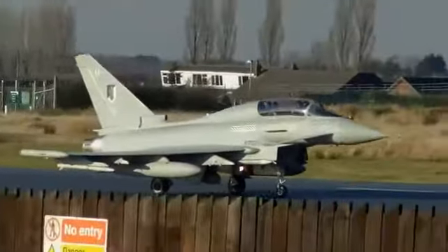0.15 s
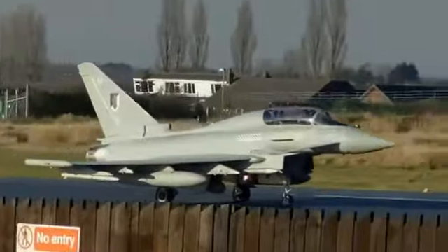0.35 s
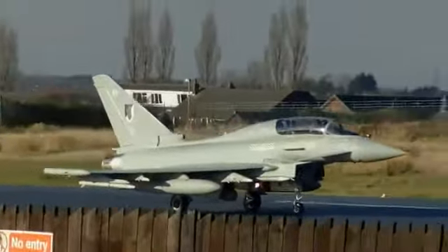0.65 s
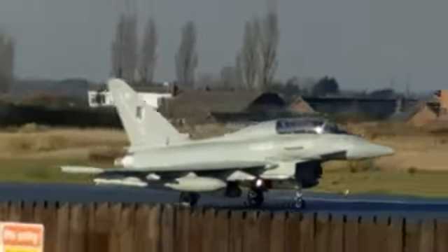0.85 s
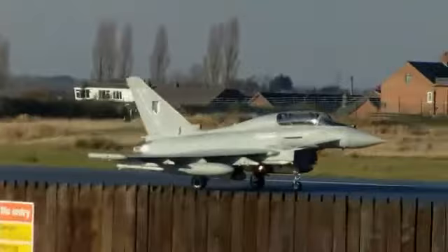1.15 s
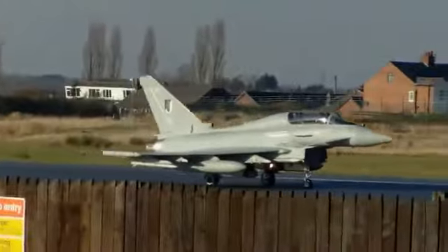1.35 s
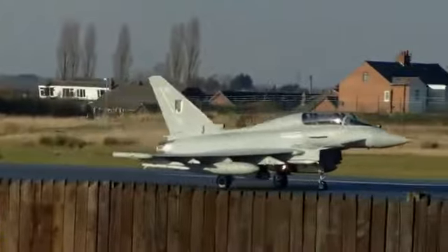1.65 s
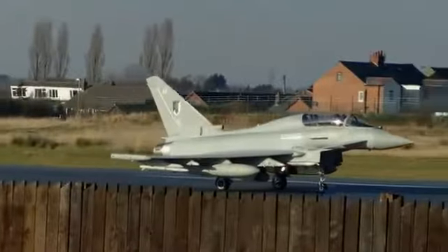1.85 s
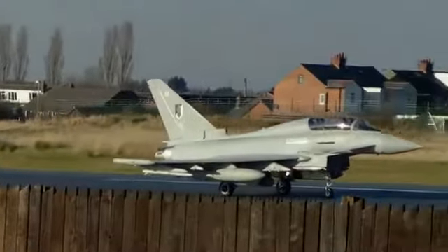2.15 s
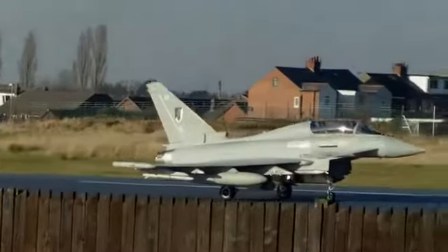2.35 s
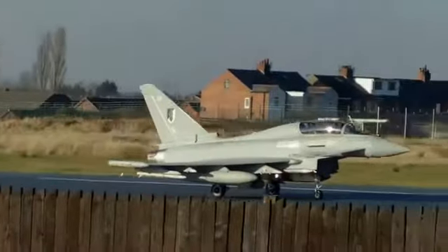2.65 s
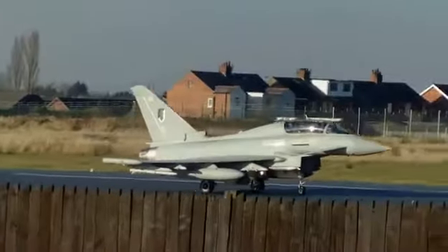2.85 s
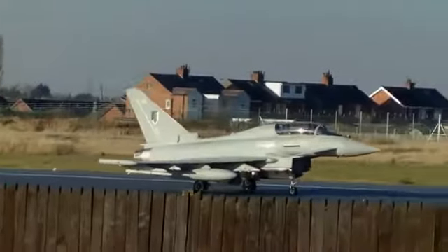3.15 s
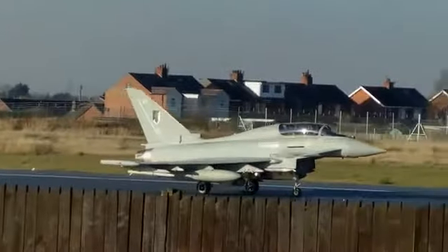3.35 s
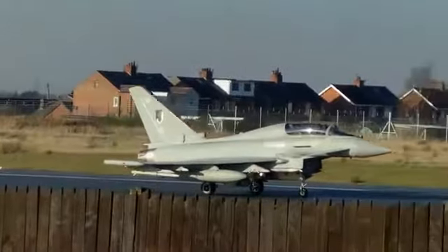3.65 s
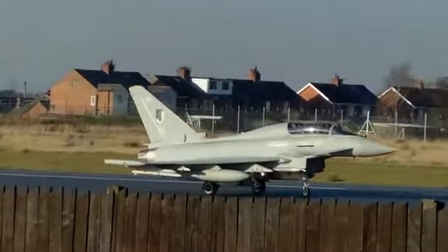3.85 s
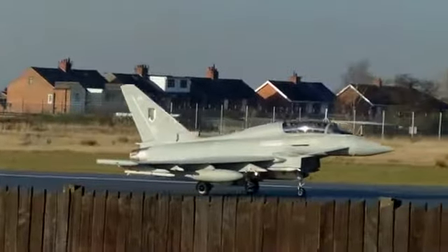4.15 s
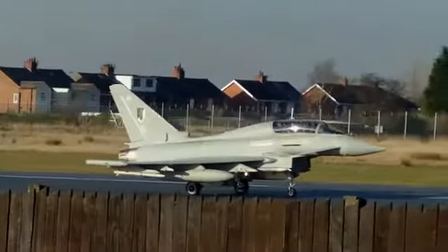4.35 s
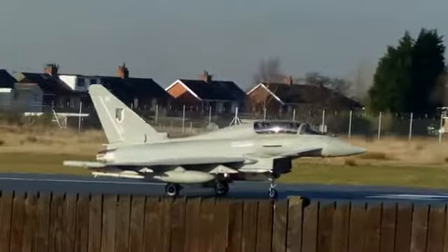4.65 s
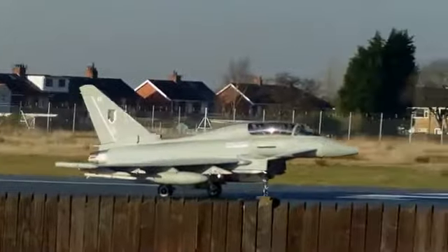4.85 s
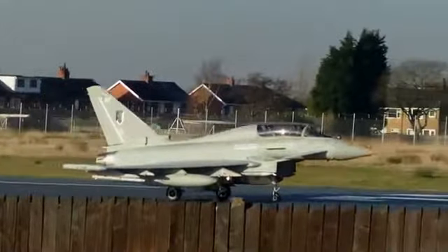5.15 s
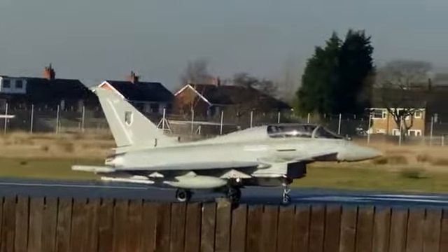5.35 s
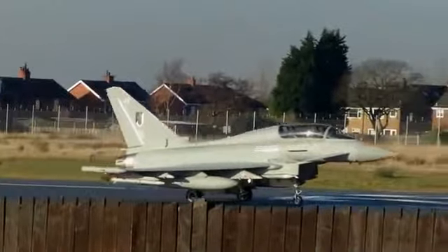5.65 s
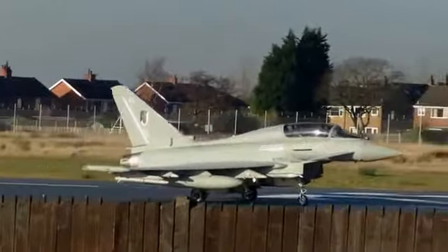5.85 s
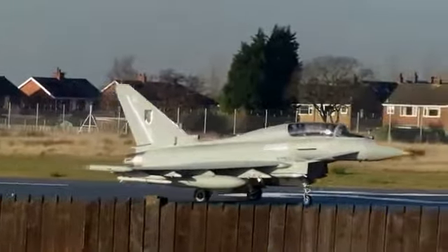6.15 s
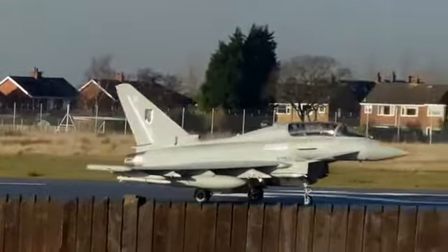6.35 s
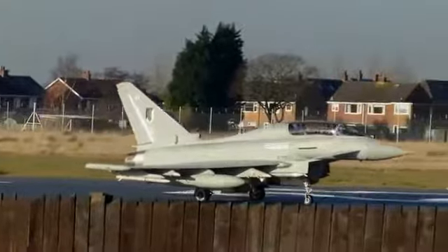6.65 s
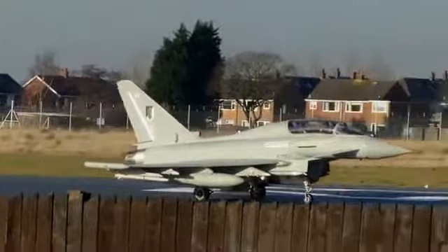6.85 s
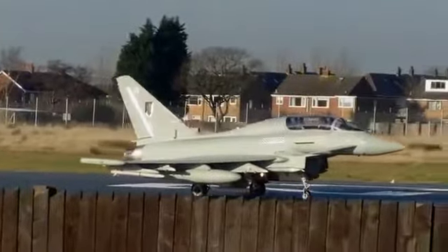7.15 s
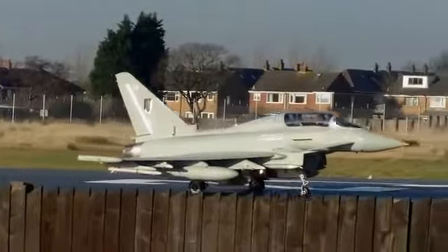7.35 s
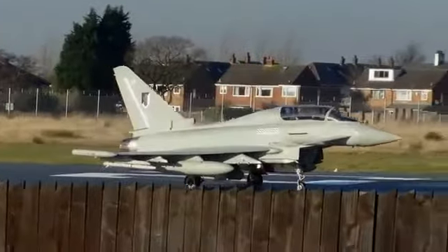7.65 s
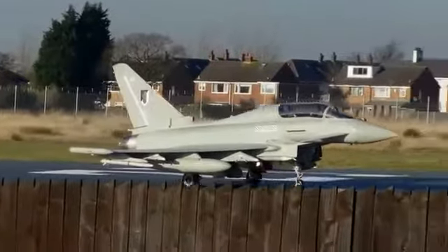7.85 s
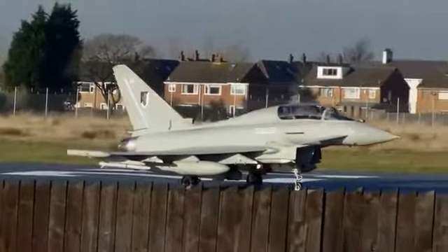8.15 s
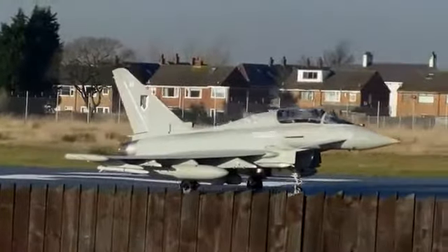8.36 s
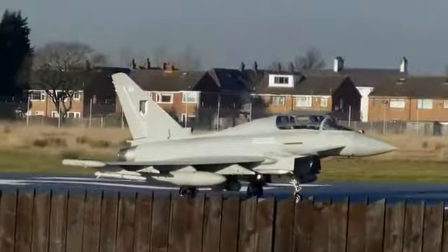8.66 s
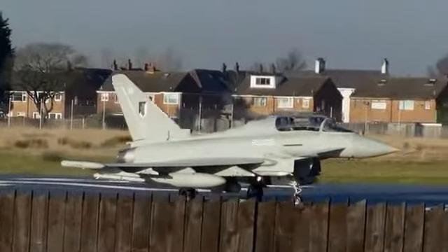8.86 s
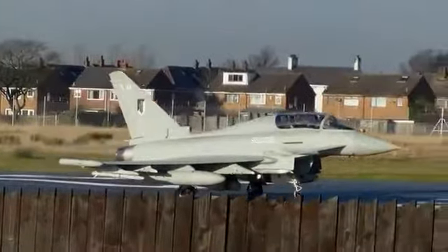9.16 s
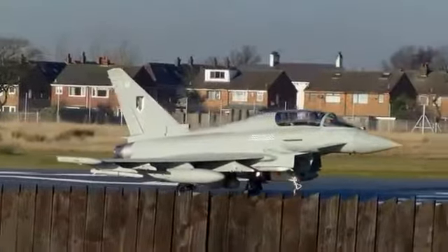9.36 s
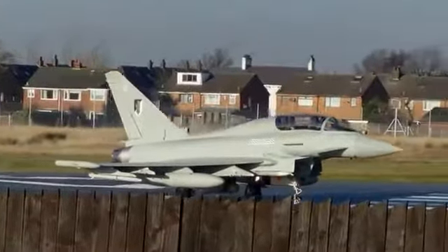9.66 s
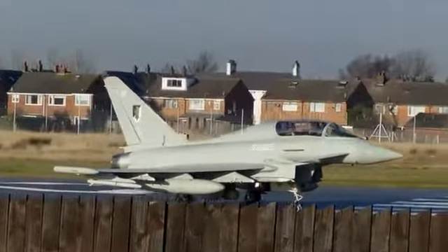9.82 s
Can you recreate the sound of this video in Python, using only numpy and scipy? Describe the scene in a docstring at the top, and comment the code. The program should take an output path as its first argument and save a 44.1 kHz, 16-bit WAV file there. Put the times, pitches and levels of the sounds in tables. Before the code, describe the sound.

Unbroken jet engine noise from a taxiing twin-engined fighter, mono and at some distance outdoors. Mid-high intake rush and sizzling hiss dominate over a weak low rumble and hollow drone. Moving air makes the treble swell and flare irregularly, several times in ten seconds. Faint blade whines waver inside the hiss. A ground reflection gives a subtle hollow colour sliding slowly downward. The roar becomes fuller in the second half; the sound never stops.

```python
"""A twin-engined jet fighter taxis past at idle, heard across an airfield fence.
Its exhausts roar and drone and its intakes rush, as noise shaped by spectra and level curves that move.
A fan howl is a band of noise around a wavering pitch; thin blade whines are wavering sine tones.
Moving air makes the treble swell, flare and fade.
A ground reflection combs the noise, and the comb slides down as the echo's lag grows."""
import sys
import numpy as np
from scipy import signal
from scipy.fft import rfft, irfft
from scipy.io import wavfile
from scipy.ndimage import uniform_filter1d

SR = 44100
rng = np.random.default_rng(int(sys.argv[2]) if len(sys.argv) > 2 else 0)


def bounce(signal):
    """Save signal as a 16-bit WAV file at the path given by the first command-line argument."""
    frames = np.transpose(np.atleast_2d(signal))
    limited = np.clip(frames, -1, 1)
    pcm = np.round(limited * 32767).astype(np.int16)
    wavfile.write(sys.argv[1], SR, pcm)


N = 440559
TIME = np.arange(N) / SR
FRAME, HOP = 2048, 512  # samples
FRAME_S = np.arange(N // HOP + 5) * HOP / SR
BIN_HZ = np.fft.rfftfreq(FRAME, 1 / SR)

# Relative noise spectra of the layers. Each row: frequency in Hz, density in dB.
RUMBLE_SPECTRUM = [(20, -24), (60, -23), (85, -13.5), (105, -18), (130, -3), (155, 0), (230, 1.5),
                   (285, -7.5), (400, -13), (800, -36)]
DRONE_SPECTRUM = [(250, -41), (345, -21), (390, -12), (440, 1), (490, 3), (570, 0), (660, 1.5), (790, 2.5),
                  (900, -13.5), (1400, -52)]
EXHAUST_SPECTRUM = [(350, -33), (600, -26), (765, -19), (835, 1), (1100, 3), (1270, 3), (1390, -5),
                    (1530, 0.5), (1750, 1.5), (2100, -12.5), (3000, -44)]
INTAKE_SPECTRUM = [(1100, -42), (1600, -4), (1850, -4), (2050, 1), (2300, 3.5), (2430, -0.5), (2580, 1),
                   (2800, 0), (3300, -2.5), (3750, -4.5), (4100, -15), (5000, -42), (7000, -44.5)]
HISS_SPECTRUM = [(2800, -40), (3700, 0.5), (4150, 2), (4600, -1.5), (5300, -2), (6100, -6), (6900, -10.5),
                 (7600, -15.5), (8200, -17.5), (9000, -22.5), (10500, -32), (15000, -50)]
FIZZ_SPECTRUM = [(3000, -15), (7000, -3), (10000, 0.5), (12500, 2), (15000, -1)]
# Humps of turbulence chopped by the blades. Each row: centre in Hz, width at half lift in Hz, lift in dB.
INTAKE_HUMPS = [(2036, 230, 3), (2620, 270, 2.5), (3200, 250, 4)]
HISS_HUMPS = [(4710, 130, 4.1), (4910, 250, 7.8), (5740, 190, 4), (6470, 370, 5.9), (7220, 540, 5.3)]

# Low moan of the engines. Each row: time in seconds, level in dB.
MOAN_LEVEL = [(1.5, -75), (3.5, -68.5), (10, -67)]
# Jet pipes, whose roar grows as they turn into view.
# Each row: time in seconds, roar in dB, drone in dB, both before their trims.
EXHAUST_LEVEL = [(0, -42, -45.5), (1, -44.5, -45.5), (2.3, -41.5, -46.2), (3, -44.5, -47.5),
                 (3.4, -40.5, -46.5), (4.9, -41.5, -45), (6.1, -38, -46), (7.5, -36.5, -47.5),
                 (10, -35.5, -47.5)]
# Engine fronts as the aircraft nears and turns side-on.
# Each row: time in seconds, fan rush in dB, blade hiss in dB, both before swell and trim.
INTAKE_LEVEL = [(0, -32, -43.4), (1.8, -35.5, -47), (2.8, -39, -47), (3.5, -34.5, -48), (4.2, -35.5, -46),
                (6.5, -26.5, -37), (10, -27.7, -40.5)]
# Fan howl, a fuzzy whistle that beams out at both ends of the pass.
# Each row: time in seconds, mean pitch in Hz, level in dB against the rush before swell and trim.
HOWL = [(0, 2065, -8), (1.15, 2085, -8), (1.7, 2050, -22), (3.7, 2195, -13), (5, 2181, -15), (7, 2130, -16),
        (8, 2111, -8.5), (10, 2065, -7.5)]
# Compressor blade tones. Each row: frequency in Hz before the Doppler shift, then the level in dB
# against the untrimmed hiss at the start, a third of the way, two thirds and the end.
BLADE_TONES = [(4708, -13, -30, -20, -17), (4986, -22, -13.5, -15, -21), (5736, -12, -26, -24, -19),
               (6482, -20, -23, -19.5, -24)]
# Falling pitch of the pass. Each row: time in seconds, frequency factor of the blade tones.
DOPPLER = [(0, 1.006), (2, 1.003), (5, 1.0), (10, .9975)]

# Swelling and fading of the treble on its way through the moving air.
# Each row: time in seconds, swell in dB before each layer takes its share.
SWELL = [(0.0, 2), (0.43, 5.5), (0.62, -1.5), (0.82, -1.5), (1.3, -7), (1.82, 5), (3.28, -3.5), (3.65, 0.5),
         (3.96, -0.7), (4.22, 4), (4.52, 2), (4.96, 2.5), (5.12, 0.8), (5.4, 2.5), (5.78, -3), (6.1, 1.8),
         (6.27, -1.2), (6.73, 0.5), (7.18, -3), (7.6, 0.8), (7.96, -2), (8.38, 1.5), (8.74, -1), (9.12, 1),
         (9.77, -1), (10.0, -0.5)]
# The higher the sound, the more the air moves it.
HOWL_SWELL, RUSH_SWELL, HISS_SWELL = 0.47, 0.88, 1.18
# Gusts in which the top of the hiss flares up.
# Each row: peak time in seconds, strength in dB before its shares in tilt and level.
FLARES = [(.46, 1.5), (2.3, 6.5), (3.68, 5.5), (4.24, 7), (4.92, 2.5), (5.38, 4.5), (6.28, 6), (7.11, 6.5),
          (7.48, 3.5), (8.23, 3.5), (9.92, 7.5)]
FLARE_HALF_S = 0.098  # from the peak to half strength

# The ground echo's lag grows steadily; its strength peaks around the closest point.
ECHO_LAG_MS, ECHO_LAG_MS_PER_S = 1.539, 0.044
ECHO_STRENGTH, CLOSEST_S, ECHO_SPAN_S = 0.35, 6, 3.26

# Narrow notches filtered out by the camera. Each row: centre in Hz, width in Hz.
NOTCHES = [(3948, 190), (7850, 170)]
EDGE_HZ = 15050


def gain_of(db):
    """Level and amplitude: 20 dB is a factor of ten in pressure."""
    return 10 ** (np.asarray(db) / 20)


def evened(x):
    """Normalisation of power: the signal is scaled to rms 1."""
    return x / np.sqrt(np.mean(x ** 2) + 1e-20)


def follow(rows, t):
    """Linear interpolation: every column of a curve at the times t."""
    s, *columns = np.transpose(rows)
    return [np.interp(t, s, column) for column in columns]


def colour(points, humps=()):
    """Spectral envelope in dB: straight lines over log frequency, with bell-shaped humps added."""
    hz, db = np.transpose(points)
    envelope = np.interp(np.log(BIN_HZ + 1), np.log(hz + 1), db)
    for centre, width, lift in humps:
        envelope = envelope + lift * .5 ** ((2 * (BIN_HZ - centre) / width) ** 2)
    return envelope


def wander(rate, size=8192):
    """Low-passed chance: a random curve of rms 1 with changes up to about rate a second."""
    t = np.linspace(0, TIME[-1], size)
    hz = np.fft.rfftfreq(size, t[1])
    spectrum = rfft(rng.standard_normal(size)) * np.exp(-(hz / rate) ** 2)
    return np.interp(TIME, t, evened(irfft(spectrum, size)))


def eddies(rate):
    """Slow random motion of the air: a wandering curve, one value a frame, as a column."""
    return np.interp(FRAME_S, TIME, wander(rate))[:, None]


def patches(frames, bins):
    """Correlated randomness: smoothed patches over time and frequency, rms 1."""
    field = rng.standard_normal((len(FRAME_S), len(BIN_HZ)))
    for _ in range(2):
        field = uniform_filter1d(field, max(1, int(frames)), axis=0)
        field = uniform_filter1d(field, max(1, int(bins)), axis=1)
    return evened(field)


def turbulence(shape_db, level_db):
    """Turbulent noise: random phases under a moving spectrum, whose total power follows a level curve."""
    shape = gain_of(shape_db) * np.ones((len(FRAME_S), 1))
    shape /= np.sqrt(np.mean(shape ** 2, axis=1, keepdims=True))
    chance = rng.standard_normal(shape.shape) + 1j * rng.standard_normal(shape.shape)
    _, noise = signal.istft((shape * chance).T, nperseg=FRAME, noverlap=FRAME - HOP)
    return gain_of(level_db) * evened(noise[:N])


def noise_band(hz, width_hz):
    """Modulation: slow complex noise on a carrier makes a bell-shaped band, rms 1, around its pitch."""
    offset_hz = np.fft.fftfreq(N, 1 / SR)
    bell = .5 ** (2 * (offset_hz / width_hz) ** 2)  # width_hz is the full width at half power
    flutter = np.fft.ifft(np.fft.fft(rng.standard_normal(N)) * bell)
    carrier = np.exp(2j * np.pi * np.cumsum(hz * np.ones(N)) / SR)
    return evened((flutter * carrier).real)


def arriving():
    """Propagation through moving air: howl, rush and hiss (dB) each take their share of the swell."""
    rush_db, hiss_db = follow(INTAKE_LEVEL, TIME)
    swell_db = follow(SWELL, TIME)[0]
    return rush_db + HOWL_SWELL * swell_db, rush_db + RUSH_SWELL * swell_db, hiss_db + HISS_SWELL * swell_db


def flares(t):
    """Gusts: the strength (dB) of the flaring at the times t, each rising and falling as a bell."""
    return sum(strength_db * .5 ** (((t - s) / FLARE_HALF_S) ** 2) for s, strength_db in FLARES)


def ground_comb(blur_hz=5200):
    """Interference of direct and reflected sound (dB); rough ground scatters the treble and blurs the comb."""
    t = FRAME_S[:, None]
    lag_s = (ECHO_LAG_MS + ECHO_LAG_MS_PER_S * t) / 1000
    strength = ECHO_STRENGTH * np.exp(-((t - CLOSEST_S) / ECHO_SPAN_S) ** 2)
    echo = np.clip(strength, 0, .9) * np.exp(-(BIN_HZ / blur_hz) ** 2)
    return 20 * np.log10(abs(1 + echo * np.exp(-2j * np.pi * BIN_HZ * lag_s)))


def rumble(rumble_db=-60, moan_hz=345, moan_width_hz=75):
    """Low-frequency engine noise: a steady broad rumble, and a narrow moan that rises as the aircraft nears."""
    moan_db = follow(MOAN_LEVEL, TIME)[0]
    moan = gain_of(moan_db) * noise_band(moan_hz, moan_width_hz)
    return turbulence(colour(RUMBLE_SPECTRUM), rumble_db) + moan


def exhausts(comb, patchy_db=2.0, roar_trim_db=0.7, drone_trim_db=0.22, roar_slide=0.086, drone_slide=0.14):
    """Jet noise: a hollow drone and a roar, whose spectra sink in frequency during the pass."""
    roar_db, drone_db = follow(EXHAUST_LEVEL, TIME)
    past = (FRAME_S[:, None] - CLOSEST_S) / FRAME_S[-1]
    ripple = comb + patchy_db * patches(frames=22, bins=8)
    drone_shape = np.interp(BIN_HZ * (1 + drone_slide * past), BIN_HZ, colour(DRONE_SPECTRUM))
    roar_shape = np.interp(BIN_HZ * (1 + roar_slide * past), BIN_HZ, colour(EXHAUST_SPECTRUM))
    drone = turbulence(drone_shape + ripple, drone_db + drone_trim_db)
    roar = turbulence(roar_shape + ripple, roar_db + roar_trim_db)
    return drone + roar


def intakes(comb, patchy_db=0.83, trim_db=0.28, tilt_per_db=0.77, eddy_tilt_db=0.36, eddy_rate=5):
    """Broadband fan noise: the rush brightens with every swell, and eddies tilt its spectrum at random."""
    swell_db = follow(SWELL, FRAME_S)[0][:, None]
    db_per_octave = tilt_per_db * swell_db + eddy_tilt_db * eddies(eddy_rate)
    tilt = db_per_octave * np.log2(np.clip(BIN_HZ, 1900, 4200) / 2600)
    patchiness = patchy_db * patches(frames=12, bins=12)
    shape = colour(INTAKE_SPECTRUM, INTAKE_HUMPS) + comb + tilt + patchiness
    howl_db = follow(HOWL, TIME)[1]
    share = np.clip(1 - gain_of(howl_db) ** 2, .1, 1)  # power left to the rush beside the howl
    _, rush_db, _ = arriving()
    return np.sqrt(share) * turbulence(shape, rush_db + trim_db)


def fan_howl(trim_db=0.3, width_hz=110, waver_hz=32):
    """Turbulence chopped by the first fan stage: a narrow band of noise around a wavering pitch."""
    hz, beam_db = follow(HOWL, TIME)
    howl = noise_band(hz + waver_hz * wander(21.96), width_hz)
    howl_db, _, _ = arriving()
    return gain_of(howl_db + beam_db + trim_db) * howl


def blade_hiss(comb, patchy_db=1.4, trim_db=0.74, calm_tilt_db=-2.0, eddy_tilt_db=1.0, eddy_rate=10.0,
               flare_tilt=1.57, flare_share=0.17):
    """Broadband compressor noise with humps: dull between gusts, bright and a little louder in them."""
    gust_tilt = flare_tilt * flares(FRAME_S)[:, None]
    db_per_octave = calm_tilt_db + gust_tilt + eddy_tilt_db * eddies(eddy_rate)
    tilt = db_per_octave * np.log2(np.clip(BIN_HZ, 4300, 7000) / 5000)
    patchiness = patchy_db * patches(frames=10.4, bins=24)
    shape = colour(HISS_SPECTRUM, HISS_HUMPS) + comb + tilt + patchiness
    _, _, hiss_db = arriving()
    return turbulence(shape, hiss_db + trim_db + flare_share * flares(TIME))


def blade_whines():
    """Blade-passing tones with Doppler shift: they waver and fade, and each beams its own way."""
    doppler = follow(DOPPLER, TIME)[0]
    whines = np.zeros(N)
    for hz, *beam_db in BLADE_TONES:
        pitch = hz * doppler + 2 * wander(3) + 8 * wander(60)  # slow and fast wavering in Hz
        beam_s = np.linspace(0, TIME[-1], len(beam_db))
        beam = gain_of(np.interp(TIME, beam_s, beam_db))
        fading = evened(gain_of(2.5 * wander(2.5)))
        tone = np.sqrt(2) * np.sin(2 * np.pi * np.cumsum(pitch) / SR)  # rms 1
        whines += beam * fading * tone
    _, _, hiss_db = arriving()
    return whines * gain_of(hiss_db)


def fizz(jet, below_db=-32.0, above_hz=2100):
    """Amplitude modulation: a faint recorder noise flickers with the instantaneous strength of the treble."""
    highpass = signal.butter(N=3, Wn=above_hz, btype="high", fs=SR, output="sos")
    treble = signal.sosfilt(highpass, jet)
    strength = np.sqrt(abs(uniform_filter1d(treble ** 2, size=9)))
    flutter_db = .4 * wander(25)
    return strength * turbulence(colour(FIZZ_SPECTRUM), below_db + flutter_db)


def scene(shimmer_db=0.29):
    """Superposition of the engine layers, plus a faint recorder noise that follows their treble."""
    comb = ground_comb()
    shimmer = shimmer_db * wander(25)  # small eddies move the compressors more than the fans
    fans = (intakes(comb) + fan_howl()) * gain_of(shimmer / 2)
    compressors = (blade_hiss(comb) + blade_whines()) * gain_of(shimmer)
    jet = rumble() + exhausts(comb) + fans + compressors
    return (jet + fizz(jet))[None]


def record(dry):
    """Linear filtering in the camera: two narrow notches, then a band limit."""
    for hz, width in NOTCHES:
        b, a = signal.iirnotch(hz, hz / width, SR)
        dry = signal.lfilter(b, a, dry)
    lowpass = signal.firwin(701, EDGE_HZ, window=("kaiser", 9), fs=SR)
    return signal.oaconvolve(dry, lowpass[None], "same")


dry = scene()
out = record(dry)
bounce(out)
```